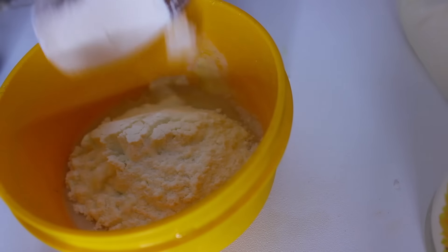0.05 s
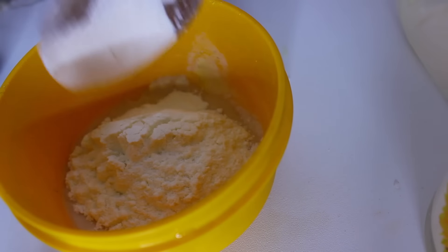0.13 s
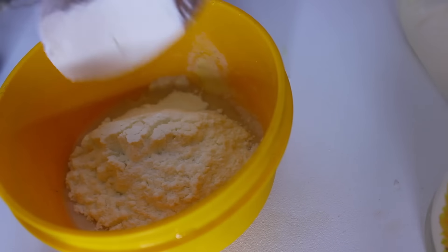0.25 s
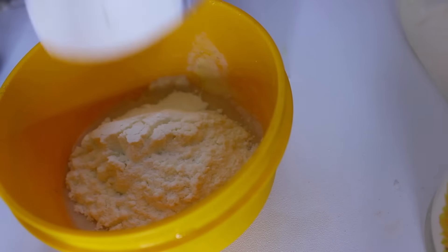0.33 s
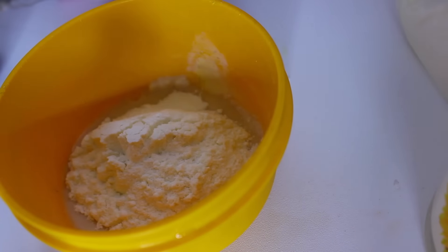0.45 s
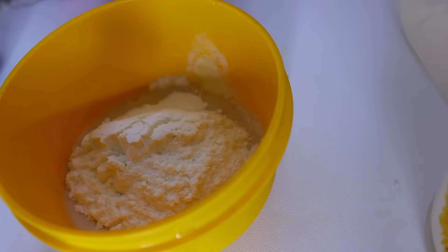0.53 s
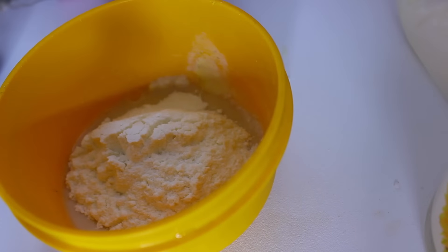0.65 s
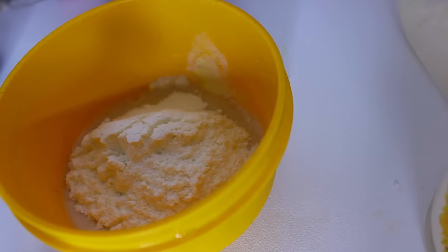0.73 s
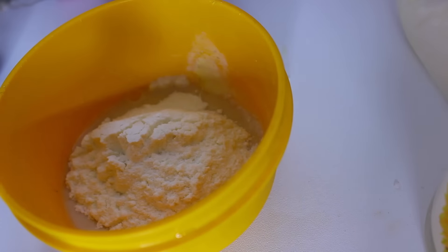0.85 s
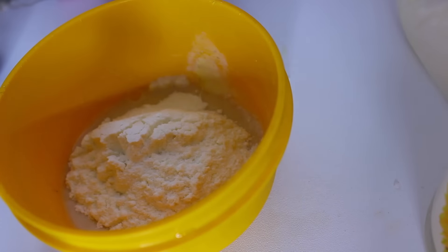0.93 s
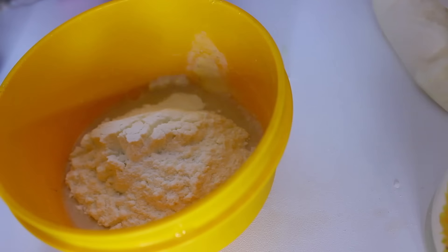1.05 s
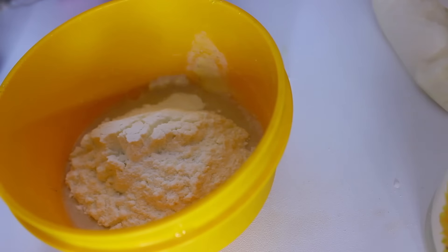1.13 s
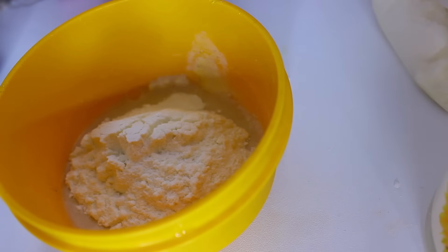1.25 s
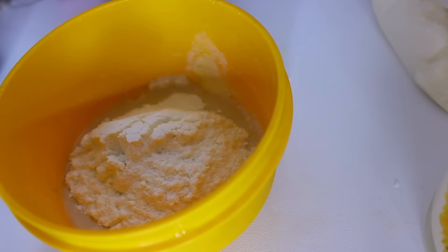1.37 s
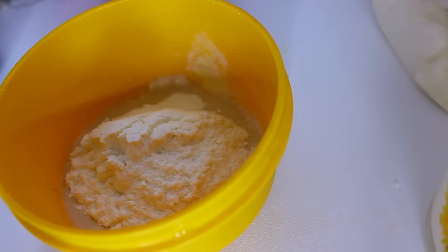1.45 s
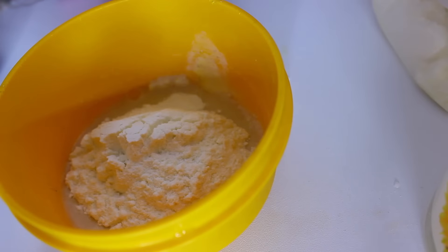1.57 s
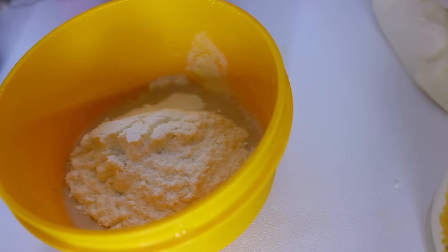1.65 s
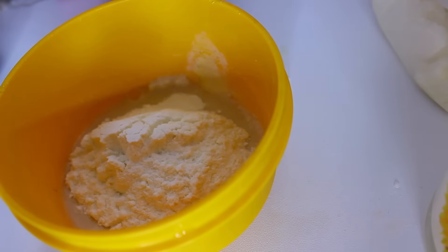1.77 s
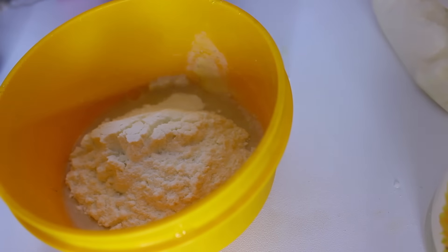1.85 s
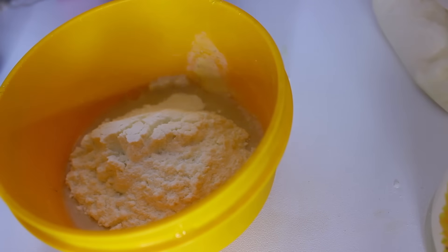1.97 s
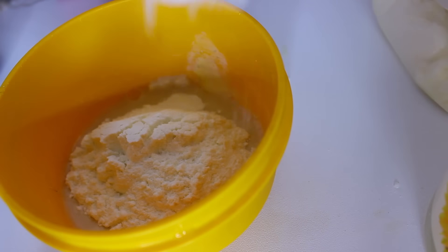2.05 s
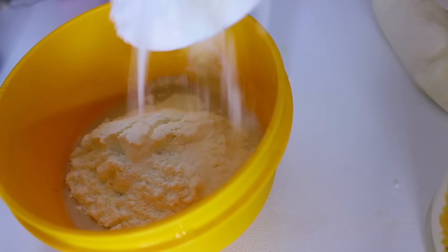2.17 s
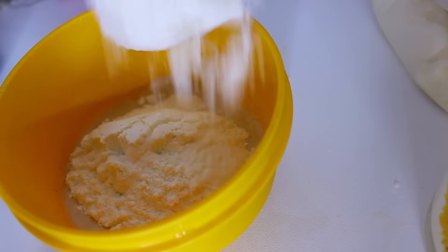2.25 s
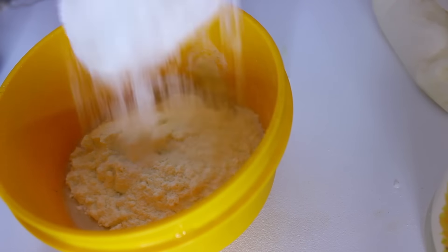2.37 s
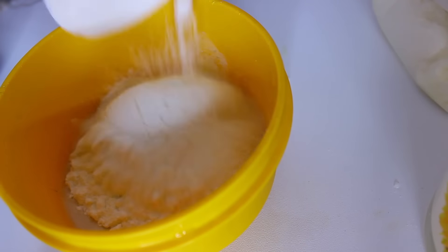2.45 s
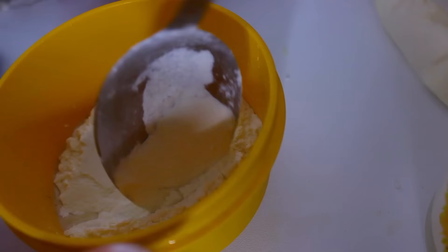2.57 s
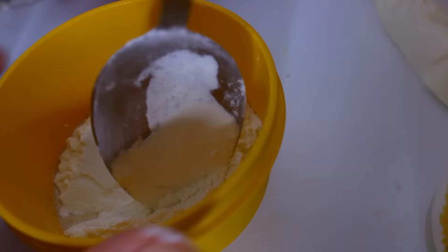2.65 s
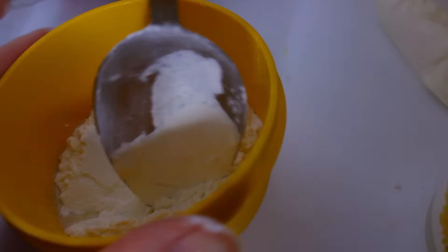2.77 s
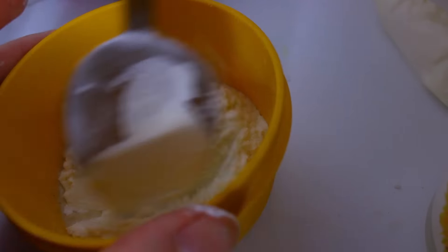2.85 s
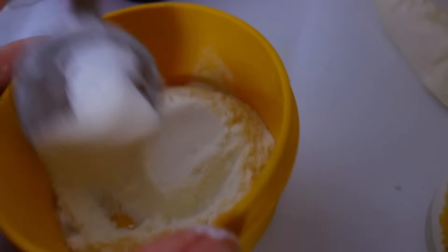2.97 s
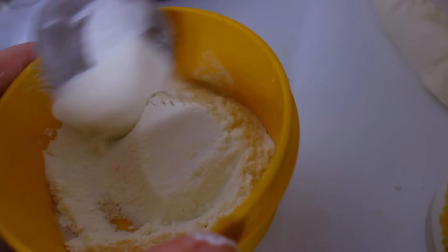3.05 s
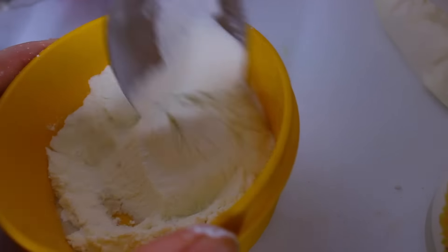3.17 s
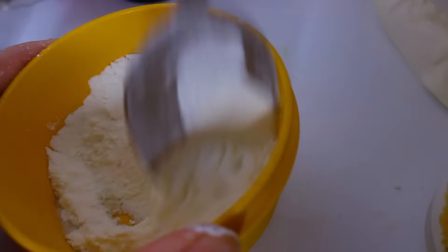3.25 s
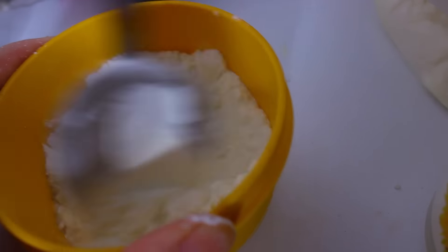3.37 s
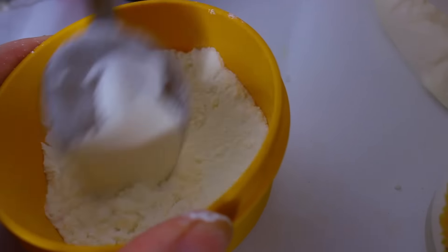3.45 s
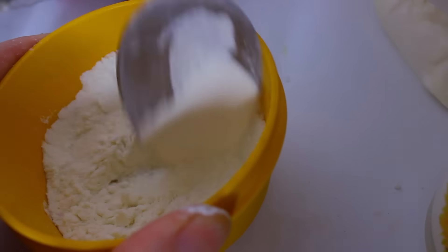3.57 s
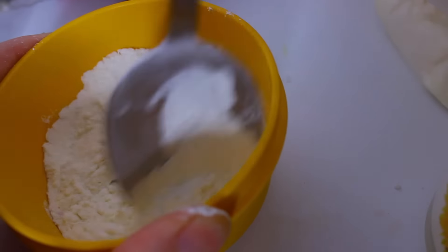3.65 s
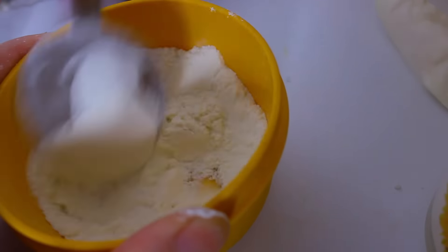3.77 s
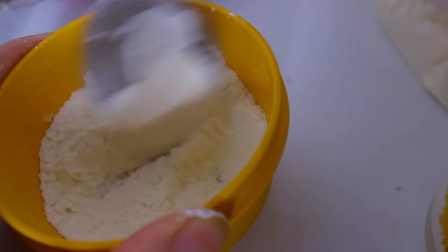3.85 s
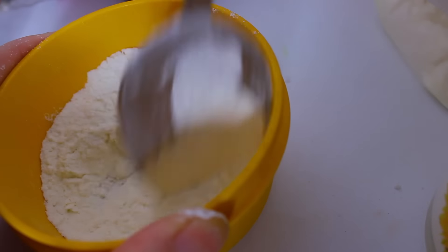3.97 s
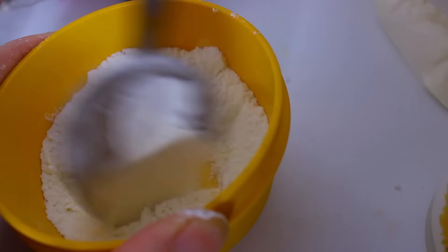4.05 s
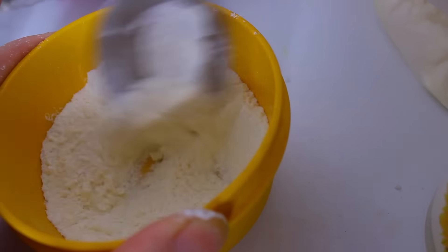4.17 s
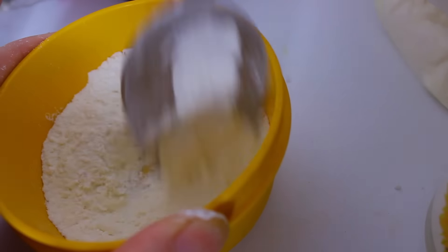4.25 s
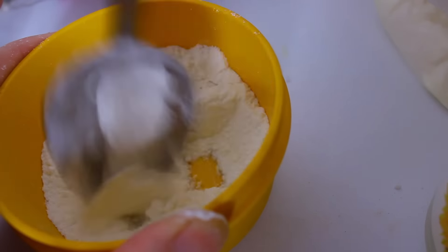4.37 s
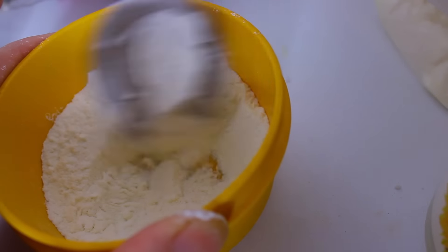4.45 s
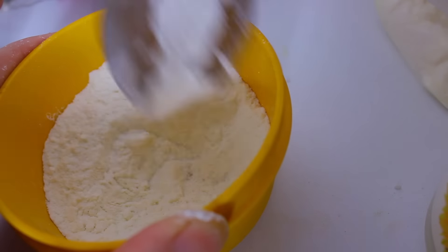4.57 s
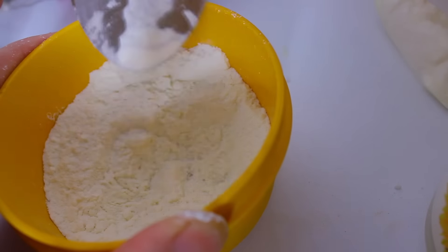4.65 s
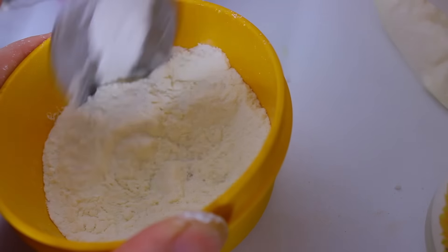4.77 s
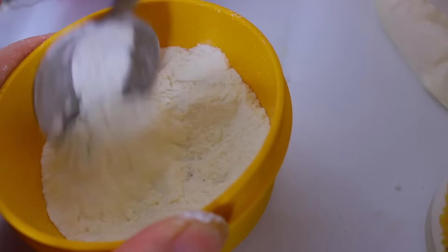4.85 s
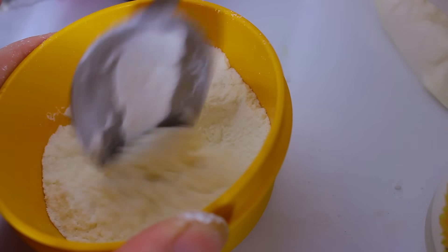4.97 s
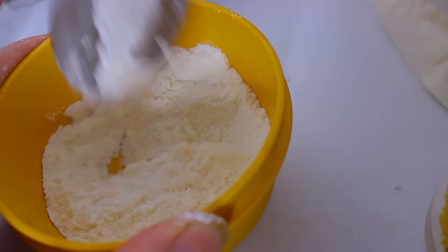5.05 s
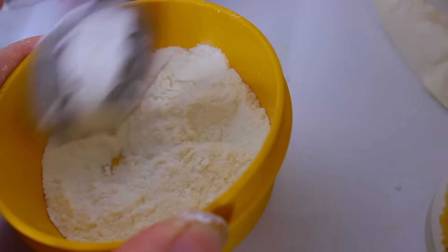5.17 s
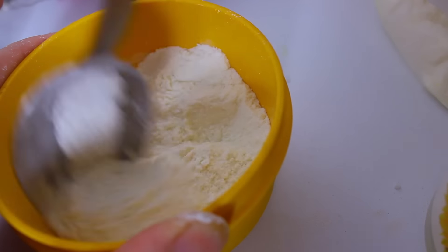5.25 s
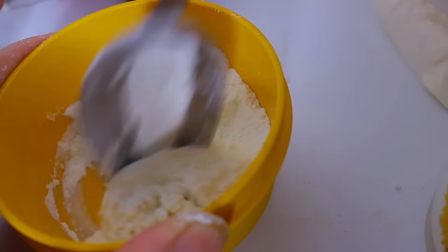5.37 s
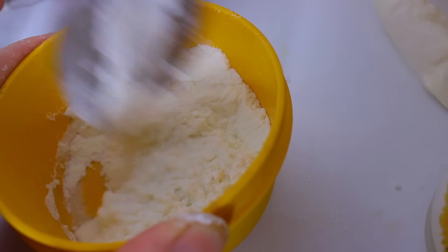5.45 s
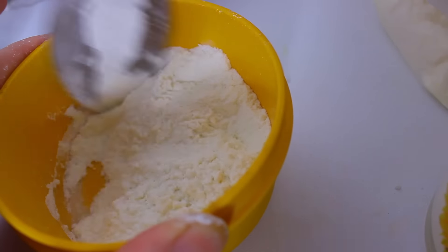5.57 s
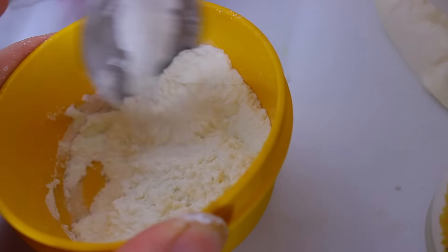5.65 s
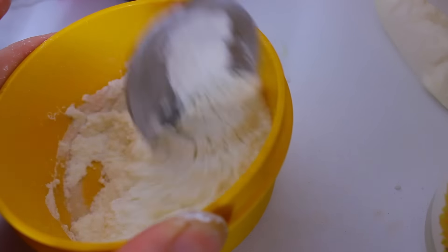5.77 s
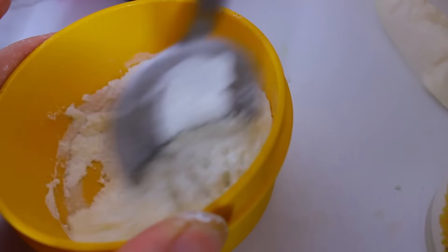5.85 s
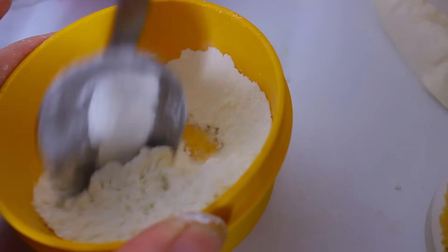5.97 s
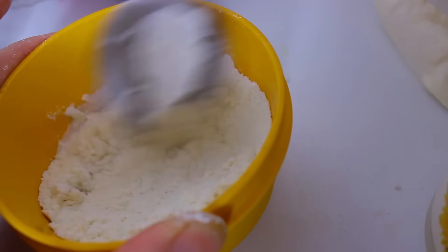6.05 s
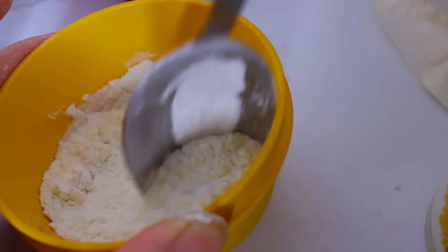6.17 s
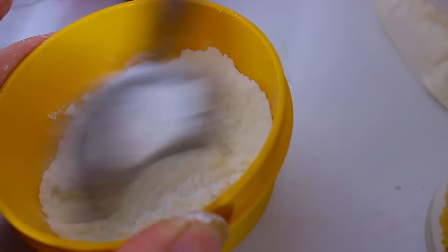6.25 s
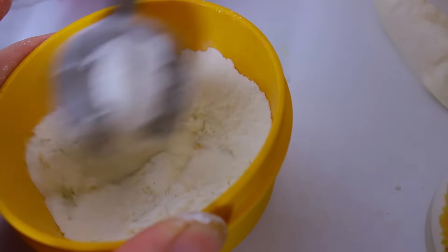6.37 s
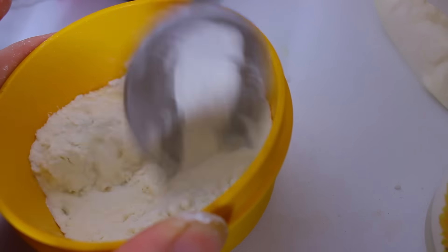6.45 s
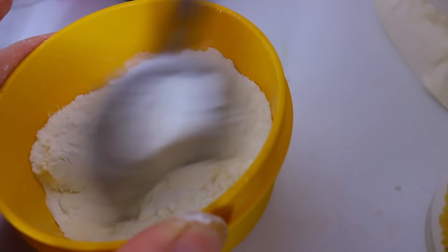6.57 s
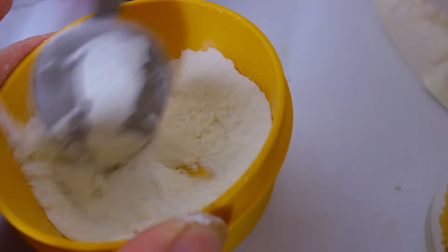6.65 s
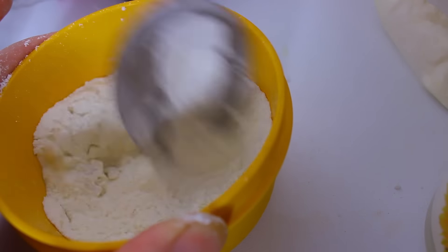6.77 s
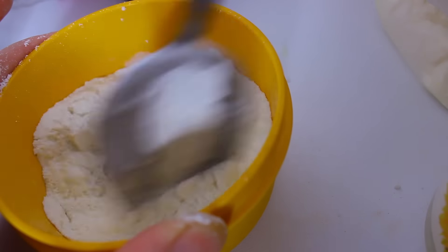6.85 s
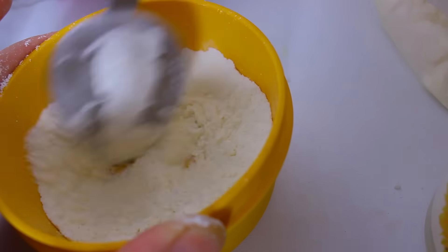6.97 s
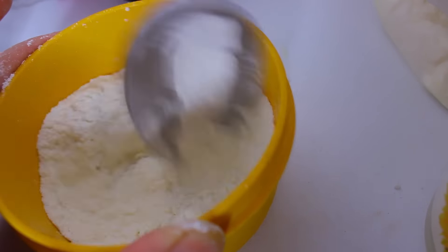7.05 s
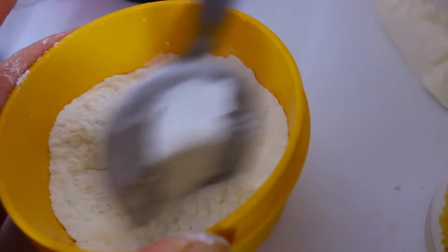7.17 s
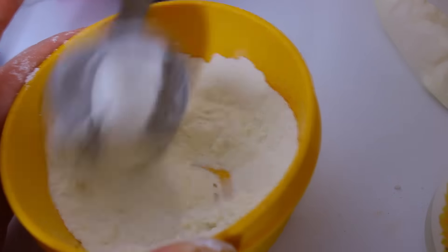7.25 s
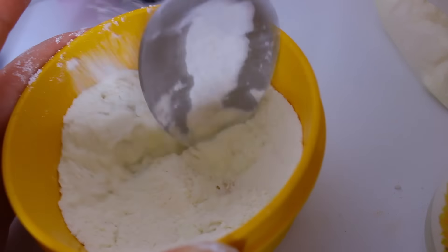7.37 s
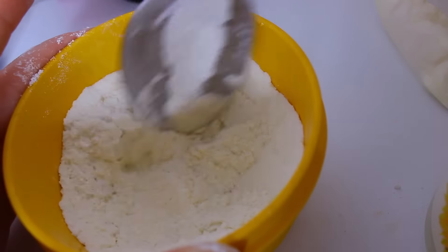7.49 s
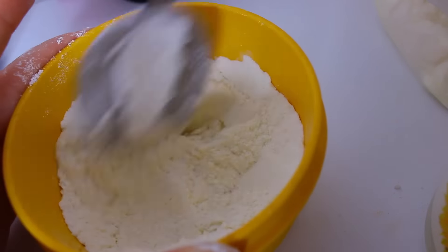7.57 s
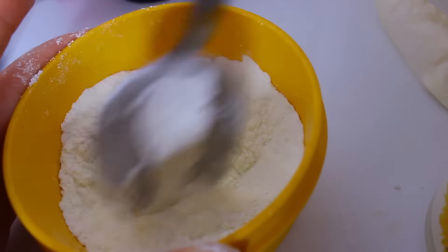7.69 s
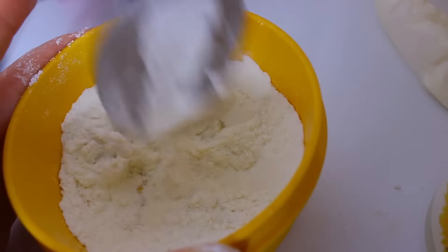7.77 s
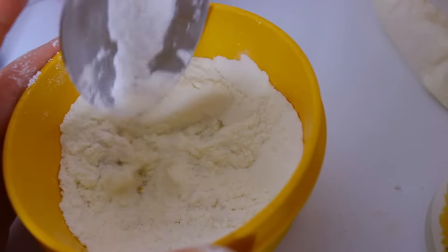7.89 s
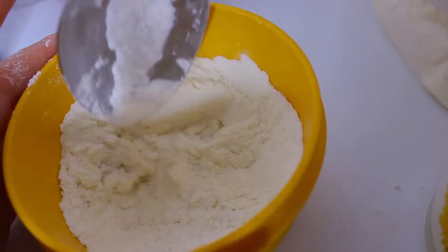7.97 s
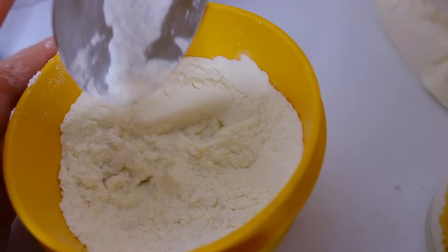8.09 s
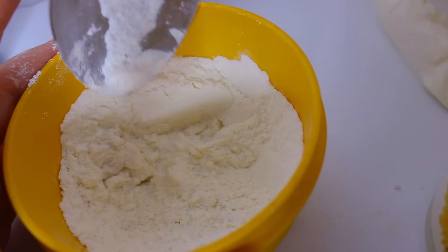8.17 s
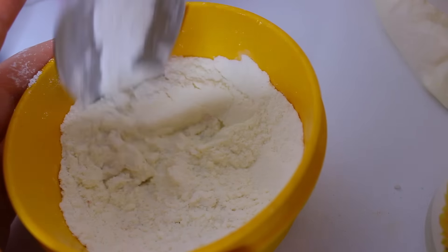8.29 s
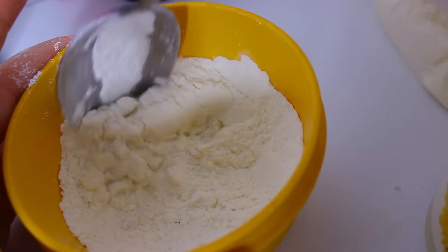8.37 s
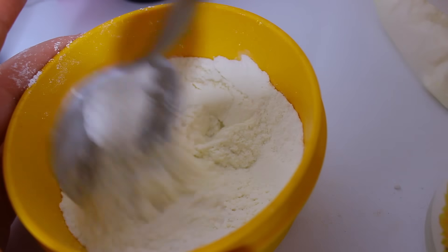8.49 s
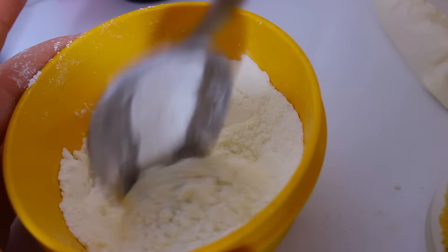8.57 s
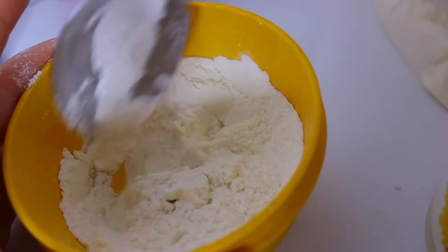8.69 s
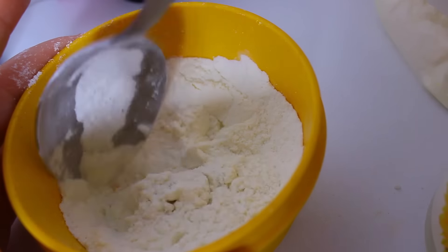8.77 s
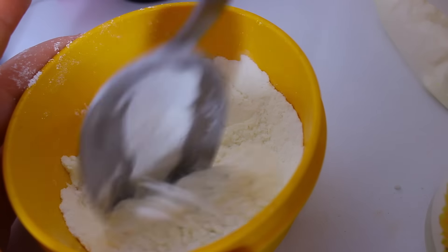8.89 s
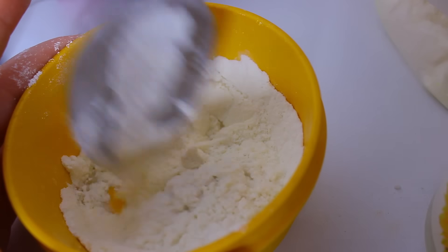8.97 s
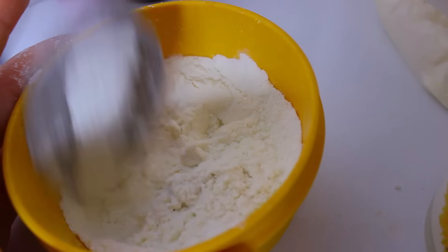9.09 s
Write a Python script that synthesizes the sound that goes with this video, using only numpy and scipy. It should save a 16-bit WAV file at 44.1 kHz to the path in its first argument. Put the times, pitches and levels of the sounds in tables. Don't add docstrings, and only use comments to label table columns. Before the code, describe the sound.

A quiet kitchen, heard close through a phone: smooth hiss, a faint low fridge hum. In the first second flour settles softly. Small dull taps come near 1.15 and 1.35 seconds, then a clearer plastic knock at 1.85. Light ticks and powdery sliding follow from 2.35 to 3.1. At 3.2 the steel spoon strikes the bowl hard, twice in quick succession, and stirring begins: short, dry clacks at about 3.7, 4.0, 4.3 and 4.6, weaker ones to 4.9, and a heavy thud at 5.3. Gritty sweeps of the edge along the wall rise between blows. Around 6.2 to 6.6 knocks crowd together with bright squeaky stick-slip chatter. More rasps and squeaks at 6.9 to 7.2, knocks at 7.2 and 7.5, a scrape at 7.7, then a lull with settling flour. Scraping resumes at 8.5, ending with a deep thudding clack near 8.9 and a brief rasp.

```python
import sys
import numpy as np
from scipy import signal
from scipy.fft import rfft, irfft
from scipy.io import wavfile
from scipy.ndimage import uniform_filter1d

SR = 44100
rng = np.random.default_rng(int(sys.argv[2]) if len(sys.argv) > 2 else 0)


def pcm_store(signal):
    levels = np.round(np.clip(np.atleast_2d(signal), -1, 1) * 32767)
    wavfile.write(sys.argv[1], SR, levels.astype(np.int16).T)


def invert_db(x):
    u = np.asarray(x, float) / 20
    return 10 ** u


N = 402633
TOP_HZ = 15850

# pitch_hz, level_db, t60_s
BODY_MODES = [(387, 1.5, 0.096), (440.7, 3.5, 0.1), (565, 14.5, 0.037), (648, 2, 0.097)]
# pitch_hz, width_hz, level_db
GRIT_BANDS = [(3360, 580, -0.5), (3900, 570, 2.5), (4570, 630, 0), (5320, 610, -1), (6060, 770, -2)]
# pitch_hz, width_hz, level_db
FINE_BANDS = [(7180, 950, -3.5), (8000, 700, -3.5), (9100, 880, -6), (10120, 720, -5), (12100, 1400, -5.5),
              (14500, 2300, -8.5)]


def unit(x):
    return x / np.sqrt(np.mean(x ** 2))


def resonate(x, hz, width):
    return signal.lfilter(*signal.iirpeak(hz, hz / width, fs=SR), x)


def band(x, lo_hz, hi_hz):
    return signal.sosfilt(signal.butter(2, [lo_hz, hi_hz], "band", fs=SR, output="sos"), x)


def walk(rate):
    hold = int(SR / rate)
    steps = np.repeat(rng.standard_normal(N // hold + 1), hold)
    return 2.24 * uniform_filter1d(uniform_filter1d(steps, hold), hold)[:N]


def onset(t, rise_ms):
    return 1 - np.exp(-(1000 * t / rise_ms) ** 2)


def swell(t, ms):
    return np.exp(-(1000 * t / ms) ** 2)


def ring(modes, t, chance, crack_db, crack_s):
    hz, db, t60 = np.array(modes).T[:, :, None]
    full = len(t)
    t = t[:int(t60.max() * SR)]
    size, shift, phase = chance[:, :len(modes), None]
    turn = 2 * np.pi * hz * (1 + .005 * shift) * t + .3 * phase
    decay = np.exp(-np.log(1000) * t / t60)
    tones = np.sum(invert_db(db + size) * decay * np.sin(turn), axis=0)
    noise = band(rng.standard_normal(len(t)), .85 * hz.min(), min(1.15 * hz.max(), 12000))
    crack = unit(noise) * np.exp(-t / crack_s)
    y = tones + invert_db(crack_db) * crack
    return np.pad(y / np.abs(y).max(), (0, full - len(t)))


def room_tone():
    # pitch_hz, level_db (per Hz)
    air = [(26, -15), (45, 2), (70, -46), (83, -7.5), (101, 4.5), (126, -9.5), (206, -3.5), (328, -7.5),
           (591, -5), (668, -5), (1740, -6.5), (2330, -7.5), (2640, -7.5), (15800, -17.5)]
    # pitch_hz, width_hz, level_db
    fridge = [(40.3, 5, -112), (103, 6.4, -76.5)]
    hz = np.maximum(np.arange(N // 2 + 1) * SR / N, 1)
    air_hz, air_db = np.transpose(air)
    shape = invert_db(np.interp(np.log(hz), np.log(air_hz), air_db)) * (hz < TOP_HZ) * (hz > 36)
    hiss = unit(irfft(rfft(rng.standard_normal(N)) * shape, N))
    hum = sum(invert_db(db) * unit(resonate(rng.standard_normal(N), f, width)) for f, width, db in fridge)
    return invert_db(-56 + .5 * walk(0.36)) * hiss + hum


def kitchen(x):
    # pitch_hz, t60_s, level_db
    echo = [(168, 0.44, -30), (280, 0.57, -48), (530, 0.59, -40), (1060, 0.55, -40), (2400, 0.51, -43),
            (5100, 0.36, -41.5), (9700, 0.038, -25)]
    t = np.arange(SR * 3 // 4) / SR
    tail = 0
    for hz, t60, db in echo:
        noise = band(rng.standard_normal(len(t)), hz / 1.37, hz * 1.413)
        tail = tail + invert_db(db) * noise * np.exp(-np.log(1000) * t / t60)
    first_walls = np.clip((t - .006) / .014, 0, 1)
    return signal.fftconvolve(x, tail * first_walls)[:N]


def whines():
    whine_s = [2.70, 3.04, 3.35, 3.55, 4.525, 4.795, 4.795, 4.95, 4.94, 5.33, 5.75, 5.77, 5.80, 5.87, 5.875,
               5.885, 6.02, 6.02, 6.451, 6.466, 6.49, 6.535, 6.775, 6.87, 6.87, 6.878, 6.885, 6.9, 6.955,
               7.147, 7.15, 7.15, 7.665, 7.69, 8.925]
    # peak_db, pitch_hz, length_ms
    whine_tones = [(-54.5, 960, 25), (-47, 1450, 16), (-46, 5600, 13), (-45.5, 4600, 5), (-57, 9500, 12),
                   (-57, 8500, 19), (-62, 10000, 15), (-54, 6200, 15), (-55, 4300, 22), (-45.5, 3050, 15),
                   (-50, 8000, 12), (-38, 3000, 4.4), (-42, 2300, 17), (-46, 1280, 24), (-51.5, 6300, 33),
                   (-45, 3780, 48), (-49, 1930, 22), (-55.5, 6100, 27), (-43, 5800, 3.7), (-44, 7100, 2),
                   (-35, 6500, 3.3), (-37.5, 4060, 10), (-44, 2380, 9.2), (-40, 1386, 27), (-55, 12300, 15),
                   (-37, 4100, 16), (-37.5, 2420, 26), (-51, 11200, 10), (-47, 6240, 21), (-36, 1400, 11),
                   (-36, 6300, 7.5), (-44, 9700, 10), (-46, 2440, 14), (-46, 3600, 40), (-45.5, 3600, 12)]
    half = SR // 10
    out, t = np.zeros(N), np.arange(-half, half) / SR
    for s, (db, hz, ms) in zip(whine_s, whine_tones):
        width = .14 * hz
        tone = unit(resonate(resonate(rng.standard_normal(len(t)), hz, width), hz, 2 * width))
        i = int(s * SR) - half
        out[i:i + len(t)] += invert_db(db) * swell(t, ms) * tone
    return out * invert_db(1.5 * np.tanh(walk(200)))


def slips():
    # start_s (loudest moment), peak_db, pitch_hz, grit_db (re peak), length_ms
    slip_events = [(3.128, -29.5, 1800, -5, 2.2), (3.037, -45, 1390, -5, 19), (4, -31, 1600, -2, 3.9),
                   (1.176, -66, 6000, 16, .4), (1.8, -65, 6000, 20, .4), (5.308, -33, 3500, 4, 1.3),
                   (6.577, -43, 2500, -7, 1.5), (8.878, -34, 2300, -5, 10.4), (9.1, -63, 2400, 8, 44),
                   (6.058, -37, 1760, -17, 13), (6.2, -32, 1960, -14, 12), (6.433, -24, 1860, -9, 3.7),
                   (6.449, -31, 1700, -7.5, 3.6), (6.454, -25, 2000, -12, 2.7),
                   (6.466, -21, 2240, -10, 1.6), (6.482, -39, 2800, -15, 2.2), (6.49, -26, 2760, -9, 8.9),
                   (6.531, -27, 2070, -8, 6.2), (6.546, -30, 2100, -20, 1.9),
                   (6.553, -20.5, 2420, -19, 3.1), (6.839, -33, 2400, -16, 1.83),
                   (6.896, -33, 2300, -2, 7.6), (7.757, -38, 2300, 1, 3), (3.121, -42, 2500, 8.5, 4.5),
                   (5.737, -40, 2900, 0, 3), (7.212, -26, 2300, -2, 3.8), (7.698, -40, 2700, -5, 3),
                   (7.722, -29, 2700, -7, 2.2), (4.799, -49, 2200, 4.5, 4.6), (7.066, -24, 2450, -6, 2.4),
                   (6.488, -27, 2100, -4, 1.1), (6.492, -24, 2200, -7, 1.3), (7.183, -34, 1500, -1, 2),
                   (6.86, -37, 1900, -9, 3), (6.925, -38, 2300, -3, 4)]
    half = SR // 40
    out, t = np.zeros(N), np.arange(-half, half) / SR
    for s, db, hz, grit_db, ms in slip_events:
        chatter = rng.standard_normal(len(t))
        tone = unit(resonate(resonate(chatter, hz, 1200), hz, 1200))
        grit = 0
        for f, width, level_db in GRIT_BANDS + FINE_BANDS:
            gain = invert_db(level_db - f / 2500 + 2.3 * rng.standard_normal())
            grit = grit + gain * resonate(chatter, f, width)
        i = int(s * SR) - half
        out[i:i + len(t)] += invert_db(db - 3.5) * swell(t, ms) * (tone + invert_db(grit_db) * unit(grit))
    return out


def drive_levels(drag_db, push_db, grit_db):
    fine_db = grit_db - 4.5 - 0.2 * (drag_db + 46.0)
    return invert_db(drag_db + np.array([0, push_db, grit_db, fine_db]))[:, None]


def pressure():
    # hardest_s, swell_ms (before), ease_ms (after), drag_db, grit_db (re drag)
    sweeps = [(.34, 90, 12, -62, 0), (2.67, 14, 83, -54, 2.5), (3.554, 7.2, 6.4, -39.5, -8),
              (3.64, 53, 22, -54, -4), (3.904, 28, 92, -54.5, -5), (4.24, 70, 76, -53, -3.5),
              (4.575, 93, 8.2, -62, -6), (5.257, 73, 6.4, -47, -1.5), (5.319, 23, 26.6, -37, -3),
              (5.67, 64, 36, -56.5, 4.5), (5.749, 19, 67, -46.5, 0.5), (5.87, 43, 57, -41, -4),
              (6.095, 290, 48, -46, -4), (6.185, 4.9, 3, -35.5, 1), (6.273, 50, 6.7, -38.5, -7),
              (6.545, 91, 25, -36, -7.5), (6.766, 18, 20, -51, 0), (6.885, 56, 34.4, -38, 0),
              (6.945, 27, 44, -45.5, -2.5), (7.157, 19, 6.5, -28.5, -1.5), (7.378, 62, 15, -46, -10),
              (7.704, 87, 73, -40, -4), (8.582, 81, 47, -44.5, -0.5), (8.853, 55, 4.4, -50.5, 0),
              (8.921, 12, 15, -44.5, 1)]
    # start_s, drag_db, fall_s (per 20 dB), push_db, grit_db (both re drag)
    slides = [(.014, -59, 0.25, -1, -3), (.09, -60, 1, -9, -3.5), (1.155, -51, 0.05, 2.5, -5.5),
              (1.358, -71, -0.1, 7, -4), (1.37, -52, -0.05, -3, -1), (1.9, -52.5, -0.7, 0, -13),
              (2.03, -58, 3.1, -2.5, -3.5), (2.542, -75, -1.5, 2, -5), (3.113, -47, -0.2, 2.5, -10),
              (3.3, -46, 0.5, -1, -6), (3.718, -40.5, 0.11, -7, -5.5), (3.345, -67, 0.02, -15, 7),
              (4.05, -54.5, 0.26, 6, -2), (4.36, -49.5, 1, -10, -7.5), (4.95, -56, 0.33, 4, -3),
              (5.3, -57, 0.24, 5, -1), (5.725, -57, 0.63, 7, 3), (6.23, -50.5, 0.18, 8.5, 1),
              (6.428, -53.5, 0.46, 4, -1), (6.62, -47, 0.4, -7, -14), (7.222, -45.5, 0.28, -1.5, -5.5),
              (7.72, -70, -1, -8, 1), (8.483, -59.5, 0.38, 6.5, -6), (8.905, -62.5, 5, 3, 2)]
    t = np.arange(N) / SR
    sweep_gain, slide_gain = np.zeros((2, 4, N))
    for top, swell_ms, ease_ms, db, grit_db in sweeps:
        start, end = top - swell_ms / 1000, top + ease_ms / 1000
        i = slice(int((start - .006) * SR), int((end + .015) * SR))
        fade = np.clip(np.minimum((t[i] - start) / .006, (end - t[i]) / .015) + 1, 0, 1)
        arc = invert_db(-np.interp(t[i], [start, top, end], [11.5, 0, 7]))
        sweep_gain[:, i] += drive_levels(db, -26.5, grit_db) * fade * arc
    for s, db, span, push_db, grit_db in slides:
        age = (t - s) * np.sign(span)
        i = (age > -.01) & (age < 2 * abs(span))
        fade = np.minimum(age[i] / .01 + 1, 1)
        slide_gain[:, i] += drive_levels(db, push_db, grit_db) * fade * invert_db(-20 * age[i] / abs(span))
    return sweep_gain, slide_gain


def scrape():
    # pitch_hz, width_hz, level_db
    push_bands = [(404, 390, -4), (810, 590, -2)]
    # pitch_hz, width_hz, level_db
    drag_bands = [(1127, 430, -3), (1420, 260, 0), (1790, 920, -3), (2310, 510, 1), (2820, 680, -4.5)]
    crushed = rng.random(N) < 3000 / SR
    grain_size = invert_db(1.5 * np.minimum(rng.exponential(size=N), 4))
    grains = crushed * grain_size * rng.standard_normal(N)
    stick_slip = invert_db(1.1 * walk(300) + .3 * walk(80))
    rub = unit(stick_slip * (unit(grains) + 1.2 * rng.standard_normal(N)))
    sift = unit(invert_db(1.2 * walk(150)) * rng.standard_normal(N))
    out = 0
    bodies = (drag_bands, push_bands, GRIT_BANDS, FINE_BANDS)
    for sweep, slide, body in zip(*pressure(), bodies):
        drive = sweep * rub + slide * sift
        gain = np.sqrt(sum(width * invert_db(2 * db) for hz, width, db in body) / SR)
        for hz, width, db in body:
            wander = invert_db(db + 3 * np.tanh(walk(50)) + 1.5 * np.tanh(walk(12)))
            own_grains = drive * rng.choice([-1, 1], N)
            tone = resonate(resonate(own_grains, hz, 1.5 * width), hz, 1.5 * width)
            out = out + wander * tone / gain
    return invert_db(-5.5) * out + slips() + whines()


def thuds():
    # start_s, counter_db, body_db (peaks)
    thud_events = [(1.153, -62, -35), (1.233, -58, -38), (1.36, -41, -42), (1.854, -38.5, -30),
                   (2.536, -46, -41), (3.113, -35.5, -29), (3.232, -30, -16.5), (3.237, -58, -14),
                   (3.375, -31, -32), (3.668, -26, -32), (4.002, -43, -28), (4.307, -32, -20.5),
                   (4.593, -27.5, -13.5), (4.765, -53, -19), (4.905, -51, -18), (5.263, -17.5, -12.5),
                   (6.184, -31, -21.5), (6.39, -37, -18.5), (6.561, -37, -24), (6.768, -43.5, -44),
                   (7.063, -40.5, -40), (7.169, -43, -23), (7.206, -54, -32), (7.479, -32, -46),
                   (7.716, -27, -52), (8.465, -45, -41), (8.86, -14.5, -13)]
    # pitch_hz, level_db, t60_s
    counter_modes = [(111, -29, 0.13), (183, -19, 0.17), (210, -12.5, 0.1), (240.6, 1, 0.13),
                     (305, -2, 0.15), (386.6, 0.5, 0.08)]
    out, t = np.zeros(N + SR), np.arange(SR // 5) / SR
    chance = rng.standard_normal((len(thud_events), 2, 3, 8))
    for (s, db, body_db), c in zip(thud_events, chance):
        y = invert_db(db) * ring(counter_modes, t, c[0], crack_db=-7.5, crack_s=0.0097)
        y = y + invert_db(body_db) * ring(BODY_MODES, t, c[1], crack_db=8.0, crack_s=0.011)
        i = int((s + 0.0015) * SR)
        out[i:i + len(t)] += onset(t, 1.3) * y
    return signal.sosfilt(signal.butter(4, 85, "high", fs=SR, output="sos"), out[:N])


def knocks():
    # side_db, rim_db, edge_db
    blows = [(1.856, -24.5, -5, -8, -31), (3.233, -15.5, -27, -10, -20), (3.239, -9.5, -2.5, -8, -48),
             (3.67, -11, -3.5, -3.5, -15.5), (4.004, -12.5, 0.5, 0, -13), (4.309, -15.5, 2.5, 5, -7),
             (4.594, -9, -2.5, -1.5, -7.5), (4.767, -22.5, -8, -17, -17), (4.907, -23.5, -2.5, -11, -21),
             (5.265, -17.5, -3.5, -4.5, -14), (5.762, -27.5, 3.5, 3, -13), (5.767, -19.5, -11, -7, -32),
             (6.187, -10, -3, 2, -7.5), (6.393, -23.5, 5.5, 9, -4.5), (6.563, -9, -6.5, -0.5, -5),
             (7.169, -14, -6.5, 0.5, -11), (7.208, -27.5, 2, 7, -2), (7.482, -10, -6.5, -1.5, -11),
             (7.716, -25, -11, 4, -23), (8.862, -17.5, -5.5, 3.5, -10.5)]
    # side_db, rim_db, edge_db
    ticks = [(1.154, -41, -7, -8, -13), (1.236, -35, -7, -12, -13), (1.362, -30, 0, 2, 4),
             (2.357, -47, -4, -26, -15), (2.405, -40.5, -6, -13.5, -20), (2.541, -44, -2, 4, -6),
             (2.652, -44, -41, 1, -7), (3.115, -32.5, 6.5, 11.5, 8.5), (3.378, -29, -2, -19, -12),
             (3.557, -30, -5, -24.5, -29), (5.796, -35.5, 1.5, 7, -32), (5.914, -44.5, 6.5, 18.5, -7),
             (5.922, -38.5, 9, -7, -14), (6.035, -33.5, 2, -1, -16), (6.766, -45.5, 5, 3, -4),
             (7.065, -34, 12, 10.5, -0.5), (7.135, -36.5, 6, 17, -4), (7.154, -37, -15, 10.5, 2),
             (7.623, -32, -5, 0, -28), (7.732, -24.5, -4.5, -1, -15), (8.469, -34, -19, -7, -18)]
    # pitch_hz, level_db, t60_s
    wall_modes = [(789, -8, 0.062), (910, -20, 0.051), (986, -16, 0.05), (1123, 2.5, 0.028),
                  (1154, -11.5, .05), (1209, -6, 0.071), (1444, -8, 0.051), (1130, -30, .5)]
    side_modes = [(1570, -2.5, 0.0097), (1739, -5, 0.019), (2135, -4, 0.012), (2373, -6, 0.0057)]
    rim_modes = [(2934, -2, 0.0088), (3274, -1.5, 0.016), (3936, -6.5, 0.016), (4370, -8, 0.014),
                 (4667, -5.5, 0.01), (1770, -35.5, 0.31), (4130, -38.5, 0.46)]
    edge_modes = [(4840, -5, 0.013), (5440, 3.5, 0.0064), (6080, -6.5, 0.01), (8000, -12, 0.011),
                  (9100, -6, 0.0058), (9900, -11.5, 0.0062), (12000, -13, .004), (14600, -19, .004)]
    out, t = np.zeros(N + SR), np.arange(SR // 3) / SR
    chance = rng.standard_normal((len(blows + ticks), 5, 3, 8))
    for (s, wall_db, side_db, rim_db, edge_db), c in zip(blows + ticks, chance):
        y = onset(t, .55) * ring(wall_modes, t, c[0], crack_db=-10, crack_s=.003)
        y = y + invert_db(-9) * onset(t, 1.4) * ring(BODY_MODES, t, c[1], crack_db=-6, crack_s=.005)
        y = y + invert_db(side_db + 11) * onset(t, .3) * ring(side_modes, t, c[2], crack_db=-11, crack_s=.002)
        y = y + invert_db(rim_db + 6) * onset(t, .12) * ring(rim_modes, t, c[3], crack_db=-8, crack_s=.0014)
        y = y + invert_db(edge_db + 12) * onset(t, .07) * ring(edge_modes, t, c[4], crack_db=-6, crack_s=.001)
        i = int((s + 0.000924) * SR)
        out[i:i + len(t)] += invert_db(wall_db) * y
    return signal.sosfilt(signal.butter(4, [200, 15500], "band", fs=SR, output="sos"), out[:N])


def scene():
    hits = knocks() + thuds()
    rub = scrape()
    top_cut = signal.ellip(10, .2, 60, TOP_HZ, fs=SR, output="sos")
    steady = signal.sosfilt(top_cut, rub + kitchen(hits + rub / 2))
    return (hits + steady + room_tone())[None, :]


def roll_off(x):
    return signal.sosfilt(signal.butter(12, 16990, fs=SR, output="sos"), x)


def record(dry):
    mix = dry + .001
    return roll_off(mix)


dry = scene()
out = record(dry)
pcm_store(out)
```